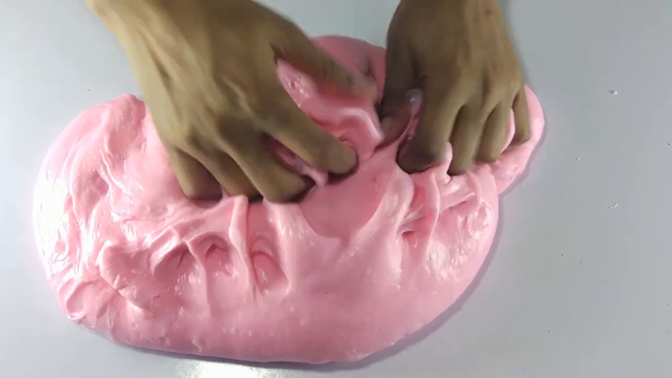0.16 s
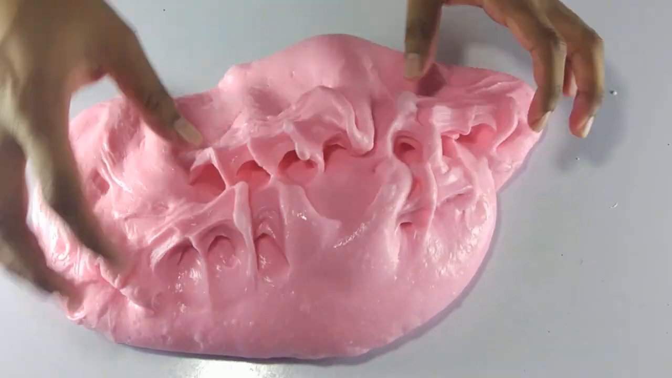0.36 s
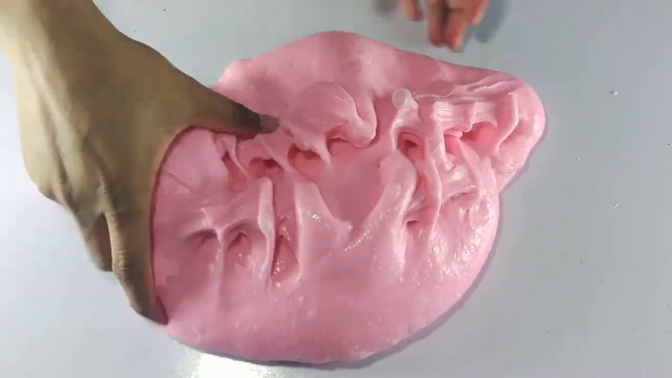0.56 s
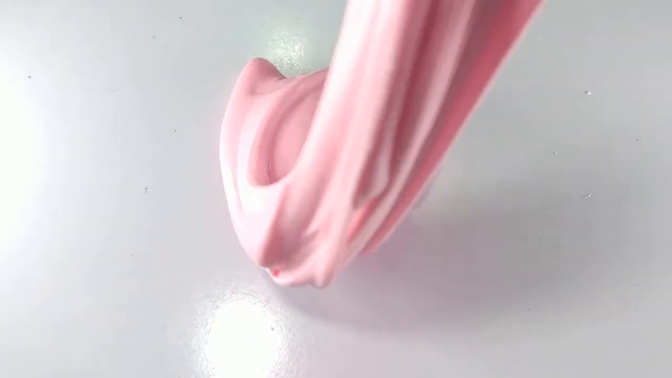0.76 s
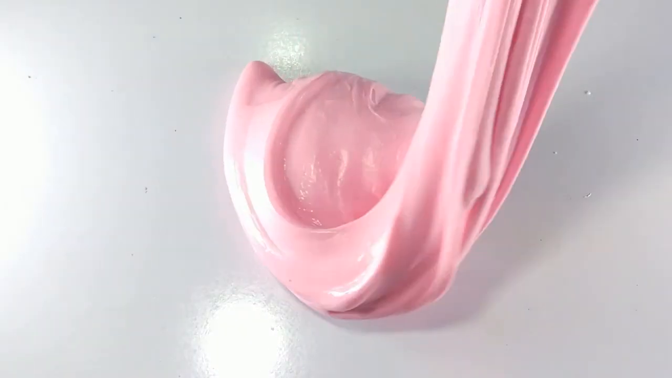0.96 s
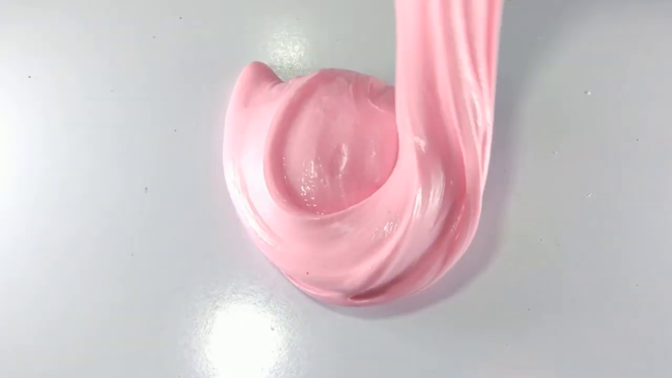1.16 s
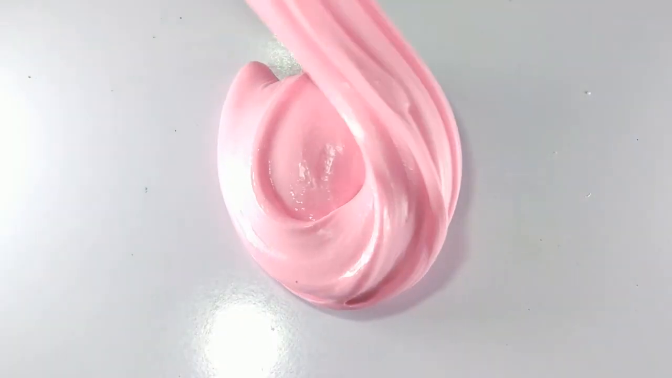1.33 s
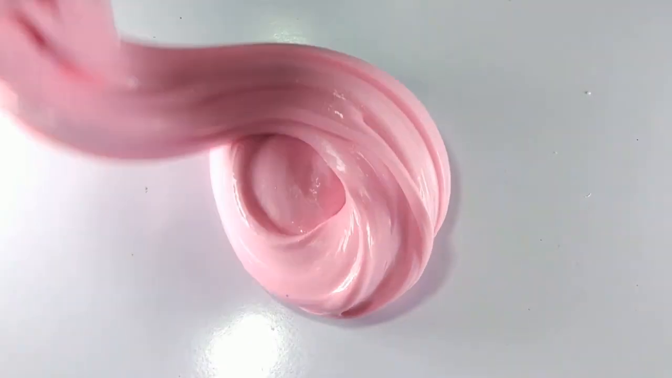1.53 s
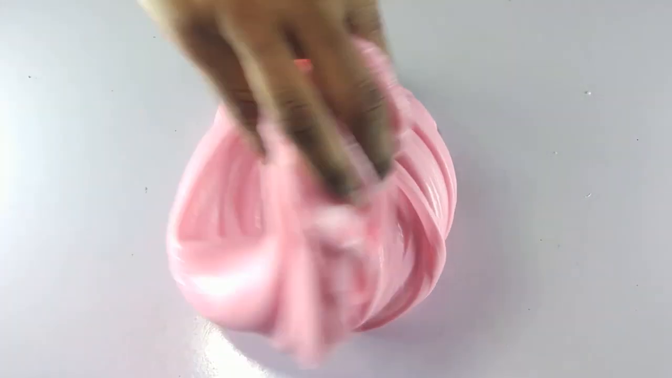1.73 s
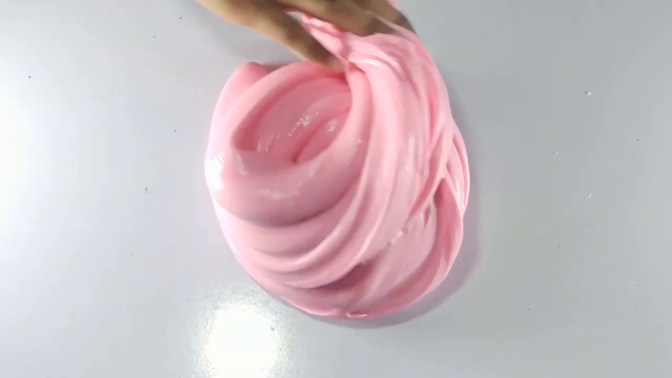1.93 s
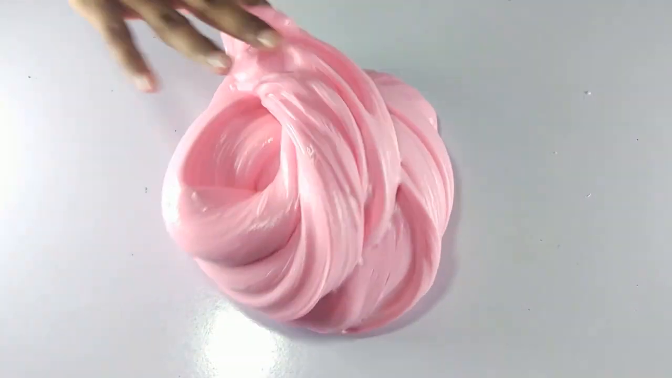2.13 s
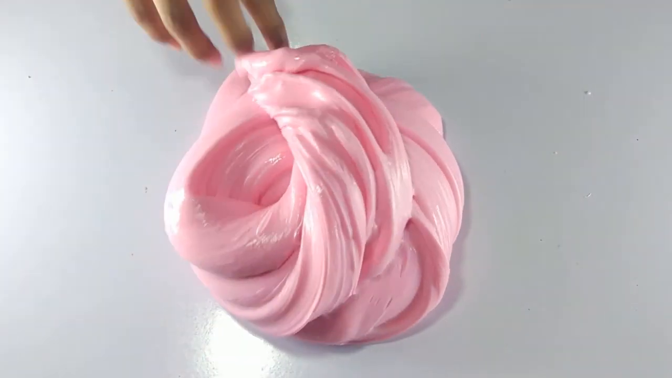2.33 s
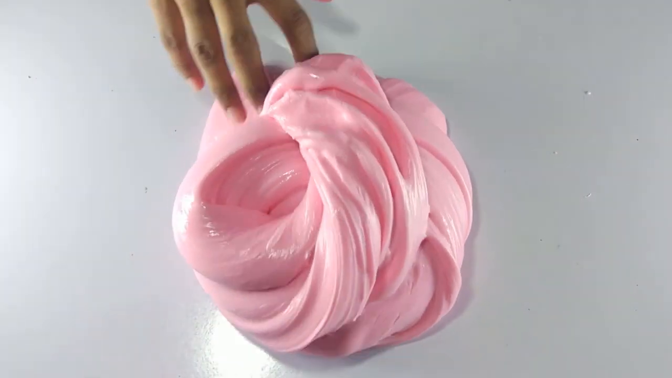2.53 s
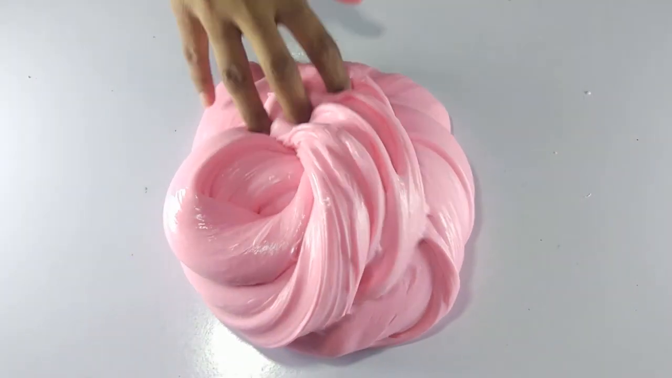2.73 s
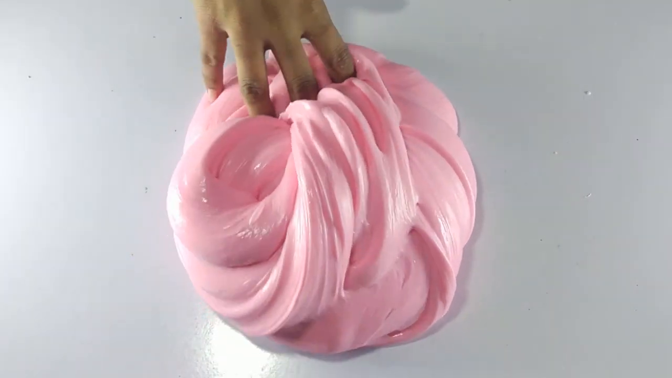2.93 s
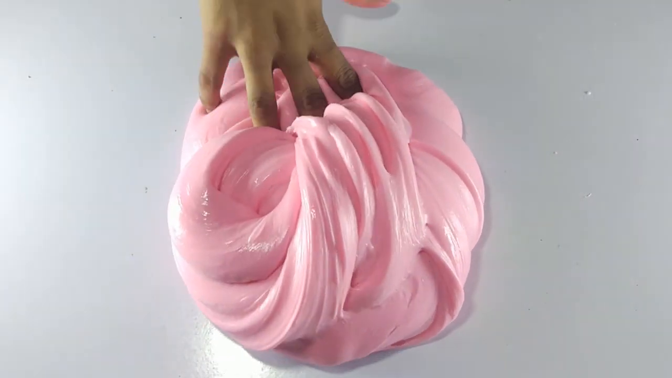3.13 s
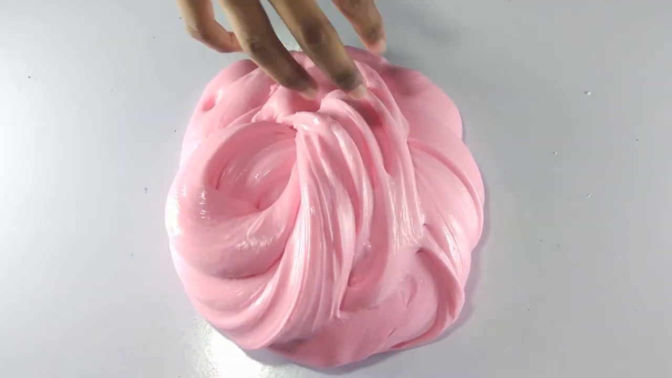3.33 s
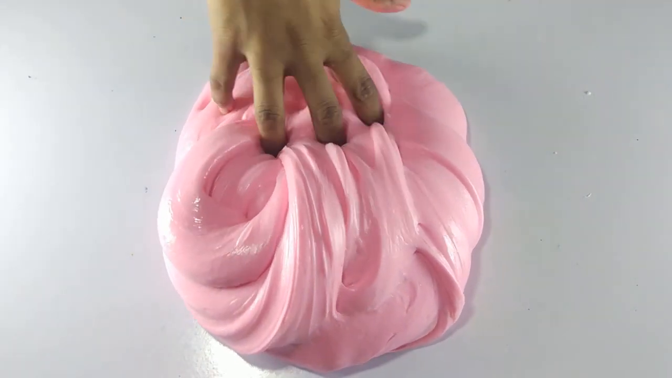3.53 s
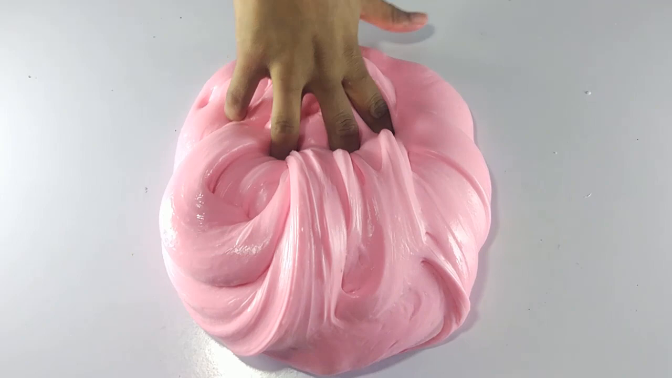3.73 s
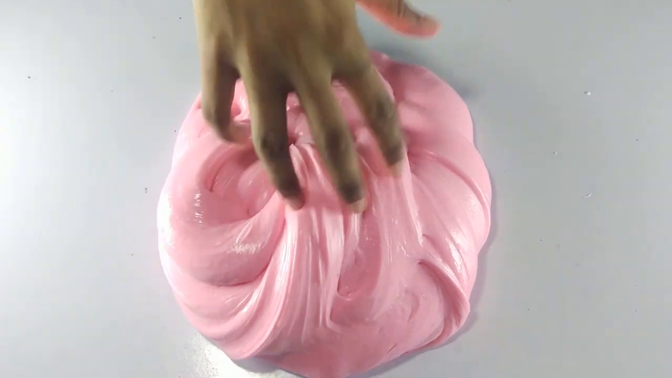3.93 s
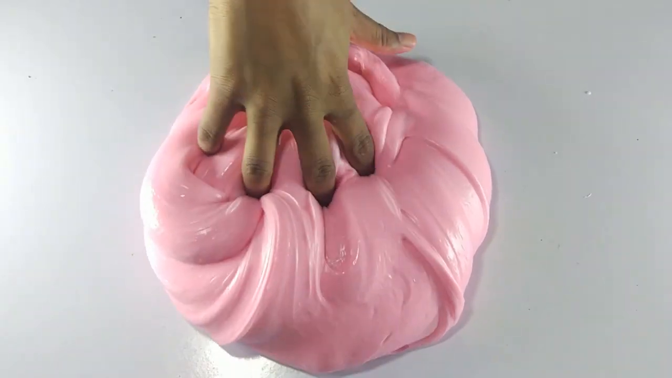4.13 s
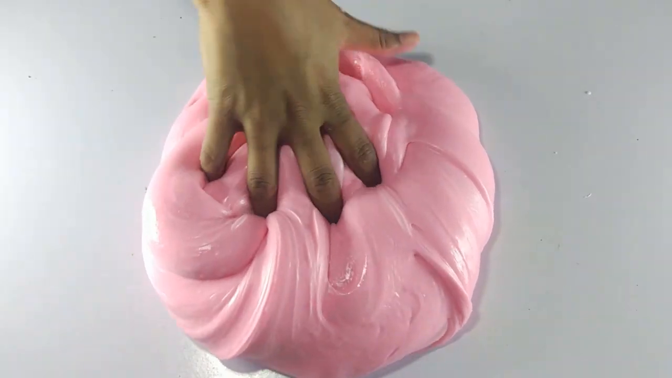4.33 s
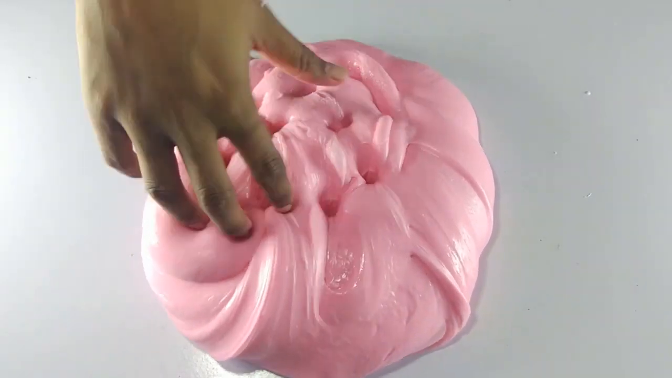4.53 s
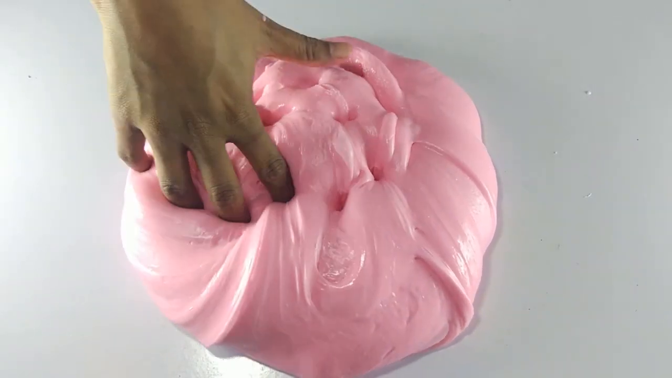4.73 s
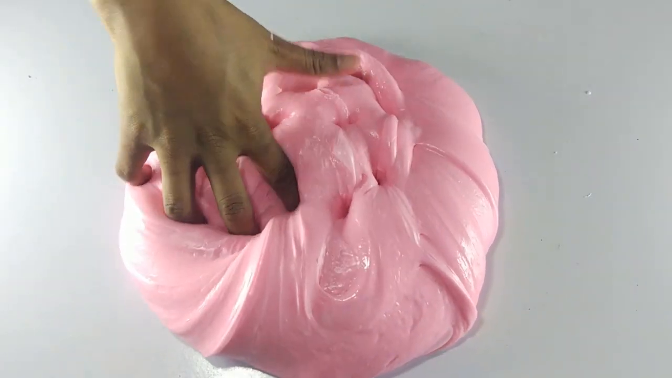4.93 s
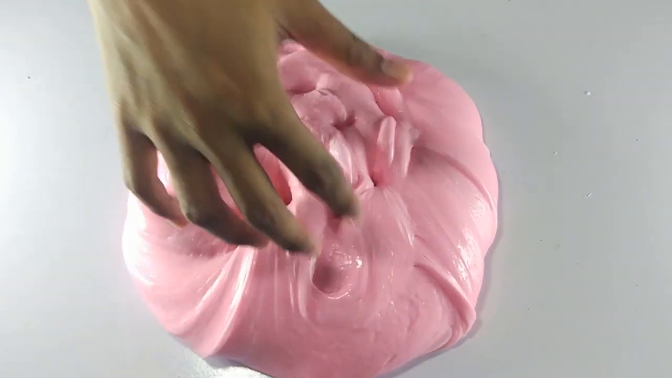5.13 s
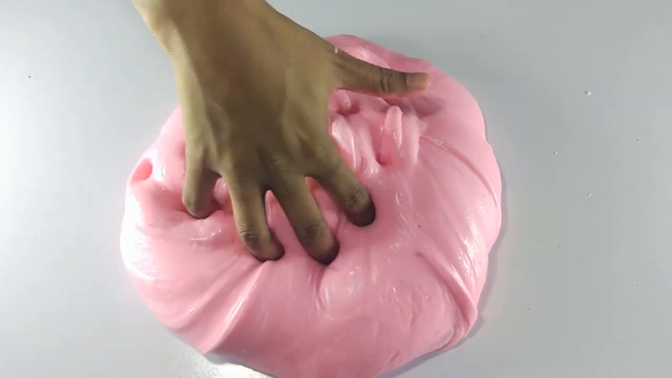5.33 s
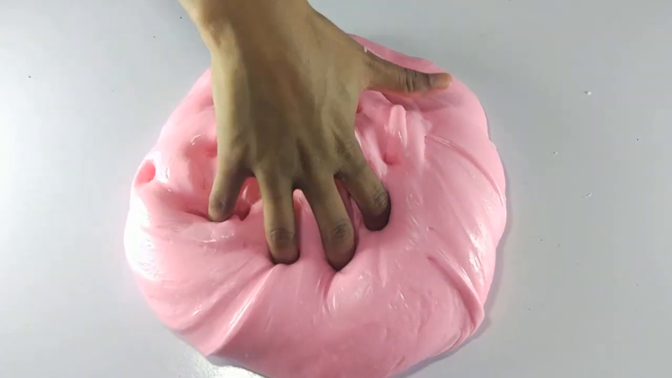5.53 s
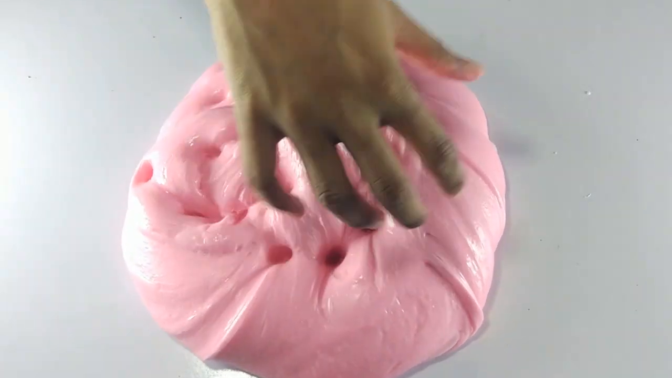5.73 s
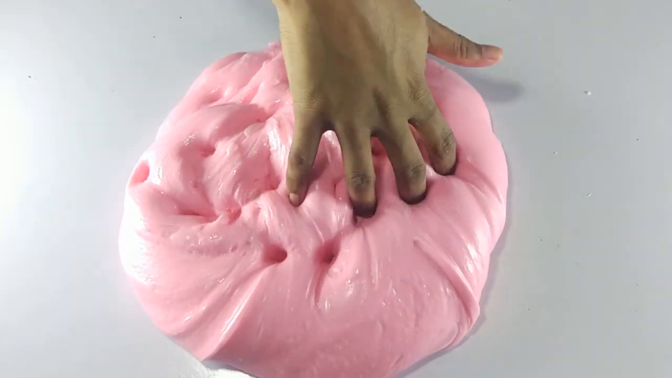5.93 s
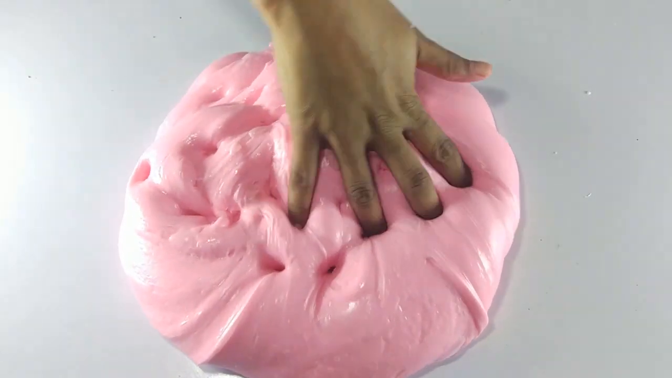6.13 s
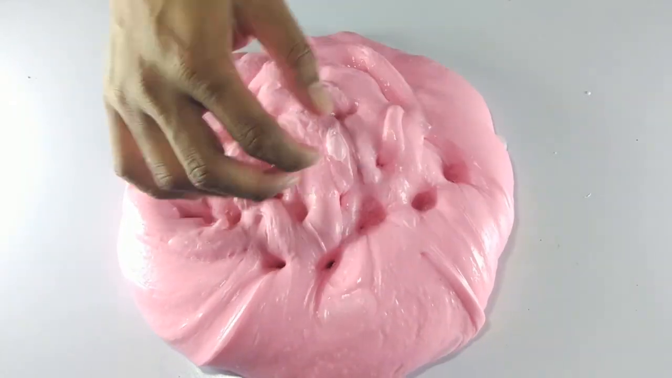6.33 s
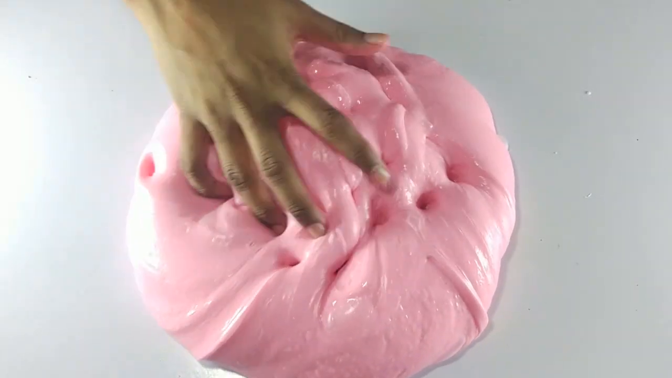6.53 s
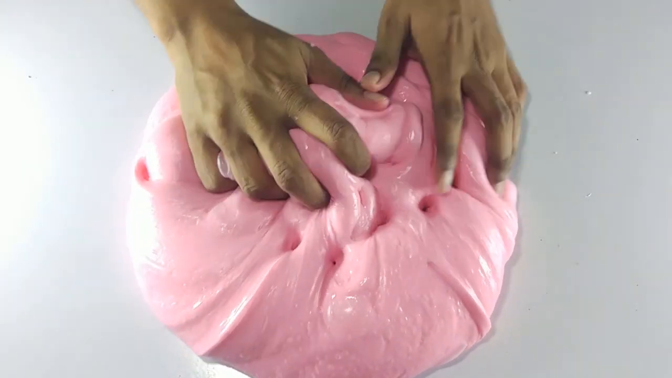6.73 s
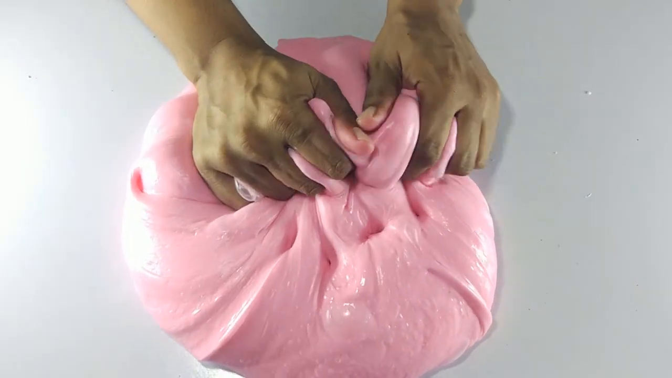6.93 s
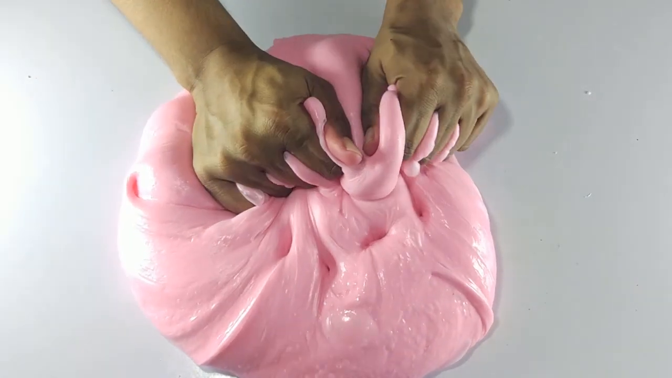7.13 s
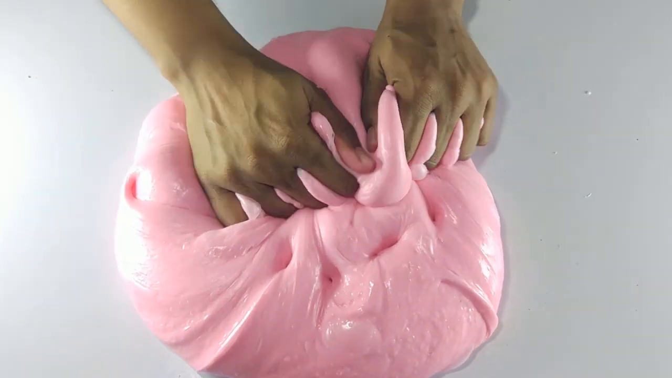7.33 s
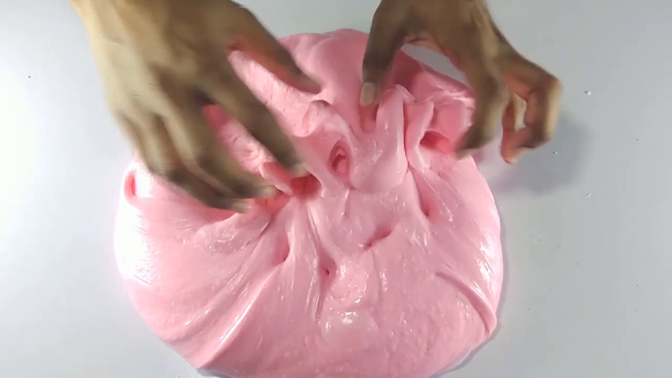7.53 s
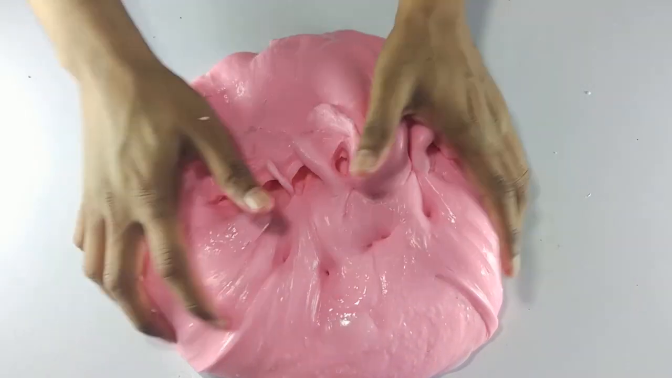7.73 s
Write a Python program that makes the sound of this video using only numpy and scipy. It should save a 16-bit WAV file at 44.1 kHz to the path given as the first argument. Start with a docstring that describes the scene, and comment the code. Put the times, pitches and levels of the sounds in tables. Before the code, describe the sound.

Hands work soft, sticky slime on a table, very close to the microphone. It opens with a sharp pop and a fizzing, wet squeeze, dotted with clicks, that cuts off at 0.7 seconds. A quiet stretch follows, with only faint peeling and tiny ticks as the slime is pulled and folded, and one sharp click at 2.7 seconds. Fingers then poke in at about 3.3, 3.9, 4.4, 5.0, 5.7 and 6.3 seconds, each time setting off a tight cluster of loud, bright pops with a short fizz and soft squelch. From 6.8 to 7.2 seconds a firm squeeze brings dense crackling, brief low gurgles of air and the loudest pop, near 7 seconds. Softer squelching and clicks continue from 7.4 seconds to the end, just before 8. The pops ring briefly in a small bare room, over faint steady hiss and low hum.

```python
"""Short wet pops and a sticky fizz: hands knead and poke foamy slime on a table in a small bare room.
Air pockets burst, bounce off the table and ring the room; skin peels off the fingers in tiny bursts.
Air squeaks out of small holes and gurgles through hollows. A faint hum and hiss lie underneath.
A two-port microphone sits just above the hands."""
import sys
import numpy as np
from scipy import signal
from scipy.fft import rfft, irfft
from scipy.io import wavfile
from scipy.ndimage import uniform_filter1d

SR = 44100
rng = np.random.default_rng(int(sys.argv[2]) if len(sys.argv) > 2 else 0)


def store_pcm(level_fs):
    """Save levels as 16-bit WAV."""
    pcm = np.round(np.clip(level_fs, -1, 1) * 32767).astype(np.int16)
    wavfile.write(sys.argv[1], SR, np.atleast_2d(pcm).T)


N = 347508

# Bursting pockets. Each row: time in seconds, level in dB, pitch in Hz, wet crack in dB, squelch in dB,
# left minus right in dB, room share in dB (low facing the microphone, high where a hand shades it).
POCKETS = [(0.012, -4.5, 7440, -9.5, -50, -3, -7), (0.094, -30, 10800, -5, -15, -14, 5),
           (0.138, -16, 4520, -7.5, -34, 1, 1.5), (0.1489, -25.5, 4250, -21, -23, -10, 13),
           (0.1682, -15, 6800, -1, -19.5, -6, 0.5), (0.2372, -29, 970, 6, -35, 5, 1),
           (0.247, -21.5, 1150, 13, -44, 6, 6), (0.2514, -21, 4500, -5, -33, 0, -10),
           (0.2951, -11, 6600, -7.5, -48, 11, 2), (0.2975, -23, 1780, -17, -45, -6, -5.5),
           (0.5743, -33, 12000, -25, -40, 3, 0), (0.5806, -22, 10000, -30, -34, -12, 5),
           (0.6143, -18, 9900, -2.5, -51, -10, 0), (0.632, -24.5, 3730, 4, -37, 7, -6),
           (0.6793, -33.5, 1550, -3, -23, -6, -5), (0.6985, -48, 2600, 2, -40, 6, -3),
           (0.7457, -56, 9900, -23, -40, 0, 0), (1.4697, -43, 9400, -13, -52, -16, 14),
           (1.7927, -39, 6200, -11, -27, 11, 8), (1.806, -49, 2500, -6, -20, 4, 2),
           (1.845, -46, 4200, -13, -30, 2, 2), (1.9073, -49.5, 2800, -10, -30, 0, -3),
           (2.0393, -46, 4200, -2, -30, -2, -4), (2.157, -35, 11200, -20, -40, 6, 3),
           (2.162, -48, 3130, -3, -30, 2, 5), (2.2156, -52, 3500, -12, -30, 2, 6),
           (2.234, -38, 12200, -19, -26, 10, -17), (2.7242, -34.5, 3300, -2, -41, 4, -4),
           (2.7376, -7.5, 11800, -26.5, -64, 5.5, -2.5), (3.231, -32, 10800, -17, -33, -10, 5),
           (3.2377, -22.5, 4930, -12, -24, 0, 10.5), (3.244, -21, 13000, -25, -25, -2, 13),
           (3.274, -2, 9200, -12, -23, 4.5, -2), (3.2769, -10, 4540, -14, -11.5, -3.5, 0.5),
           (3.4399, -30, 10900, -11, -28, -9, 4), (3.525, -32.5, 5450, -17, -35, 5.5, -2.5),
           (3.5887, -37.5, 9450, -25, -40, 12, 4), (3.727, -27, 4540, -17, -34, 3, 2.5),
           (3.854, -1, 6200, -13.5, -30.5, 6, 7.5), (3.8553, 2, 5510, -28, -56, -5, -4.5),
           (3.8781, -2.5, 9180, -10.5, -29, -2, -4.5), (3.8911, -10, 6400, -3, -11.5, -1.5, -8),
           (4.032, -18, 10500, -17.5, -58, 2, 2.5), (4.1067, -26, 8860, -22, -48, -2.5, -0.5),
           (4.202, -43.5, 8760, -7, -6.5, 0, 6), (4.4047, -20, 10260, -41, -30, -6, 9),
           (4.4203, -8.5, 6950, -35, -55, -12, 9), (4.4264, 0, 6100, -7, -25.5, 6, -3),
           (4.437, -4, 7240, -17, -17.5, -5, 4.5), (4.4393, -8.5, 6500, -16, -23, 11, -3),
           (4.6336, -32.5, 1990, 22, -18.5, -1, -2), (4.799, -37.5, 12500, -21.5, -29, 7.5, -0.5),
           (5.0215, -29, 14000, -12, -22, 6, -5), (5.0272, 2, 6770, -8, -32.5, 1.5, 3.5),
           (5.0389, -8, 6600, -4, -10, -2, 5.5), (5.045, -1.5, 4680, -41, -47, 1, 5),
           (5.0478, -2.5, 7690, -26, -45, -24, 6.5), (5.2528, -47, 2380, -8, -30, 6, 8),
           (5.286, -38, 9900, -19.5, -30, 1, 8), (5.332, -34, 8060, -27, -15.5, 5, 2),
           (5.454, -38, 9700, -10.5, -18.5, 5, 2), (5.5513, -45, 10140, -15.5, -23, 7, 0.5),
           (5.64, -37, 9600, -1, -25, -7, 9), (5.643, -28, 13600, -32.5, -30, -8, 2),
           (5.6651, -10.5, 8840, -2.5, -28, -11, 6), (5.6673, 2, 8000, -37, -47, -2, 0),
           (5.6773, -12, 8330, 0.5, -32, 13, 6), (5.6874, 1.5, 7700, -39, -30, -8, -1.5),
           (5.864, -48, 10950, -17, -32, 9, 3), (5.902, -43, 2830, -0.5, -17, 12.5, -7),
           (6.163, -44, 9200, -6.5, -9.5, -2, 14), (6.2212, -22, 1520, -18, -11.5, 2, 6),
           (6.2232, -32, 1590, -3, -31, 0, -10), (6.2427, -4, 8260, -21.5, -26.5, -3, -1),
           (6.257, -1, 7400, -29, -52, 4, -4.5), (6.2581, 2.5, 7600, -21.5, -45, -3, 1),
           (6.2614, -3.5, 3260, -13, -27.5, 0, -2), (6.266, -3.5, 5400, -16, -50, 7, 0.5),
           (6.2816, -7.5, 8430, 1.5, -13.5, 2, -2.5), (6.4584, -39, 9450, -12.5, -39.5, -5, -9),
           (6.5577, -38, 10650, -13.5, -30, -6, 13.5), (6.5657, -38, 9400, -24, -35, 0, -2),
           (6.5767, -30, 9930, -46, -42, -0.5, 5.5), (6.626, -34.5, 10500, -11.5, -30, -5, 13),
           (6.6279, -30, 4440, 4.5, -26, -2, 2.5), (6.645, -33, 9800, -26, -20, 4, 7),
           (6.6478, -29, 12300, -23, -27, -2, 5), (6.6634, -39, 5500, -13, -30, -3, 14),
           (6.705, -37, 11200, -5, -17, 2, 14), (6.727, -12, 11000, -41, -44, -2, 0),
           (6.749, -30.5, 2200, 15, -29, 4, -10), (6.7754, -20.5, 8570, -38, -40, 11.5, 10.5),
           (6.7792, -14, 1600, 1, -31, 7, 2), (6.7831, -23.5, 2400, 17, -31, -6, 5),
           (6.824, -15.5, 1150, -1, -4.5, 3, 3), (6.8706, -23, 4450, -16, 2, -1, 2),
           (6.883, -23.5, 1160, -10, 3.5, -7, 3), (6.8968, -17.5, 2040, -5, -20, 4, 8.5),
           (6.9024, -3, 1570, 0, -16.5, -1, -20), (6.9028, -9, 9200, -32, -40, 9, -4),
           (6.9583, 10.5, 10200, -6.5, -48, -2.5, -2), (6.9615, 2, 10800, -7.5, -16, -1, -5),
           (6.965, 1, 11000, -17, -36, -2, 5), (6.995, -7.5, 7700, -11, -47, -6, 7.5),
           (7.0825, -4.5, 7900, -15.5, -45, -3, -3), (7.12, -22.5, 11400, -14, -43, 4, 13),
           (7.178, -24, 9200, -18, -38, 13, 0), (7.191, -27, 7800, -11, -41, 16, 5),
           (7.2017, -35, 8900, -6, -37, 7, -5), (7.2414, -32.5, 13100, -7.5, -44, -1, 11.5),
           (7.2609, -33.5, 1470, -27, -34, 2, 2), (7.3225, -40, 12200, -19, -29, 0, 14.5),
           (7.3811, -28, 10300, -27, -18, -9, 9), (7.3958, -20, 4430, 0, -14.5, -4, 9),
           (7.429, -31.5, 1890, -6, -30, 0, -10), (7.522, -23.5, 2320, -6, -26, 2, -2),
           (7.722, -24, 4060, 0.5, -12.5, -4.5, 7.5), (7.7255, -23, 10500, -17.5, -31, -5, 7),
           (7.7776, -27.5, 13100, -5, -24, 6, 15.5), (7.8419, -19.5, 2060, -21, -32, 1, -6),
           (7.8477, -10.5, 10200, -43, -28.5, -3, 3.5), (7.8504, -20, 11600, -6, -31, 10, -11)]
# Resonances of the peeling fizz. Each row: centre in Hz, width in Hz, gain in dB.
FIZZ_MODES = [(6400, 1500, 8.5), (10500, 10900, 15), (14000, 3100, -6)]
# Resonances of the wet smack. Each row: centre in Hz, width in Hz, gain in dB.
SMACK_MODES = [(1576, 2940, 22.5), (2650, 990, 11.5), (3500, 640, 14.5), (4500, 1900, 0.5)]
# Hollows in the lump, lowest first. Each row: centre in Hz, width in Hz, gain in dB.
SQUELCH_MODES = [(234, 91, 15.5), (469, 340, 11.5), (662, 1000, 8.5)]
# Lowest hollow, fading as the lump is pressed flat. Each row: time in seconds, gain in dB.
DEEP_HOLLOW = [(0, 2.5), (.6, -3.5), (3.3, 2.5), (4.45, 3.5), (5.1, 4), (5.7, 3.5), (6.3, -11.5),
               (7.0, -5.5), (7.45, 0), (7.88, 5)]
# Reflections off table and walls. Each row: delay in seconds, gain in dB.
REFLECTIONS = [(.0015, -13), (.0034, -19), (.0114, -17), (.0154, -17)]
# Finger position. Each row: time in seconds, lag of the left port in samples.
HAND_LAG = [(0, 2.5), (2.74, 3), (3.24, 2.6), (3.28, 3.6), (3.85, 1.4), (3.88, 3.8), (4.03, .4),
            (4.42, 1.6), (4.44, 2.6), (5.03, 4.2), (5.05, 5.6), (5.665, 1.8), (5.69, 4.8), (6.24, -.6),
            (6.27, 1), (6.29, .2), (6.73, 2.4), (6.9, 3.6), (7.08, 3.2), (7.85, 5.2)]
# Squeezes, lifts and stretches. Each row: time of full strength, hold, rise and fall in seconds,
# then fizz, smack and squelch in dB.
KNEAD_STROKES = [(.008, 0.0029, 0.015, 0.027, -18, -34.5, -64),
                 (0.164, 0.091, 0.27, 0.045, -34.5, -46.5, -49.5), (0.464, .04, 0.085, 0.17, -75, -98, -63),
                 (0.584, 0.098, 0.1, 0.0098, -39, -48.5, -62), (0.855, 0.061, 0.031, 0.46, -63.5, -99, -75),
                 (1.155, 0.1, 0.11, 0.3, -80, -95, -76.5), (1.41, 0.046, 0.24, 0.096, -55.5, -75, -98),
                 (1.76, 0.054, 0.088, 0.22, -69, -96, -81), (1.796, 0.29, 0.39, 0.15, -61, -75.5, -72),
                 (2.132, 0.044, 0.054, 0.097, -55.5, -67, -88), (2.722, .01, 0.45, 0.22, -60, -69, -88),
                 (6.697, 0.011, 0.47, 0.46, -52, -66, -101),
                 (6.824, 0.075, 0.11, 0.18, -36.5, -52.5, -34.5),
                 (6.958, 0.0074, 0.021, 0.08, -30, -45.5, -26.5),
                 (7.032, 0.076, 0.14, 0.083, -34.5, -43, -63), (7.412, 0.1, .1, 0.023, -36.5, -42, -45),
                 (7.716, 0.19, 0.11, 0.11, -45, -53, -56)]
# Fingers stabbing in. Each row: deepest push in seconds, entry fizz in dB, its rise in seconds,
# squelch in dB, pull-out fizz in dB.
FINGER_POKES = [(3.282, -43, 0.041, -39, -61.5), (3.879, -44.5, 0.06, -33, -66.5),
                (4.451, -41, 0.095, -31, -84), (5.039, -46, 0.054, -31, -61),
                (5.679, -41.5, 0.061, -32.5, -68.5), (6.266, -44.5, 0.14, -28.5, -87)]
# Air through a hollow. Each row: time of full strength, hold, rise and fall in seconds, level in dB,
# pitch in Hz, share of pitch lost per second.
AIR_GURGLES = [(6.823, 0.024, 0.033, 0.035, -23.5, 557, 4.5), (6.876, 0.01, 0.023, 0.035, -29, 613, 0.7),
               (6.965, 0.015, 0.011, .05, -33.5, 340, 0.42), (7.433, 0.016, .03, 0.045, -44.5, 488, 1.4),
               (7.513, .02, .02, .03, -49.5, 730, 0.58)]
# Air leaving a small hole. Each row: start in seconds, level in dB, pitch in Hz.
AIR_SQUEAKS = [(1.4072, -54, 1860), (6.2, -34, 1894)]
# Room ring. Each row: centre in Hz, T60 in seconds, relative level in dB, build-up in seconds.
ROOM_BANDS = [(277, 0.2, 13, 0.013), (475, 0.23, 3, 0.0049), (950, 0.18, 5, 0.011), (1457, 0.14, 8, 0.0044),
              (2260, 0.24, 3, 0.0027), (3300, .26, 4, 0.0005), (5400, 0.27, -4.5, 0.002),
              (7700, 0.27, -2.5, 0.0012), (10500, 0.17, 4.5, 0.0014), (14000, 0.13, -14.5, .001)]
# Room tone spectrum. Each row: frequency in Hz, relative level in dB.
TONE_SPECTRUM = [(24, -72), (40, -27.5), (148, -16.5), (205, 2), (357, -11.5), (508, -5), (799, -21.5),
                 (2080, -20), (4000, -24.5), (6780, -24), (12400, -16), (15200, -61.5), (16400, -48)]
# Slow drift of room tone and hum. Each row: time in seconds, bass level change in dB.
TONE_DRIFT = [(0, -3.5), (.47, 1.5), (0.688, 2), (.72, -10), (.83, -5.5), (.9, 0.5), (1.2, -1.6), (1.6, -2),
              (1.8, 1.5), (1.97, -9.5), (2.2, 3.5), (2.65, -1), (3.099, 3), (4.2, 1.7), (4.8, 2),
              (5.5, 5.5), (6.0, 2), (7.88, 3.5)]
# Hum swells. Each row: time of full strength, hold, rise and fall in seconds, added hum in relative dB.
HUM_RISES = [(0.427, 0.036, 0.072, .06, 8), (1.77, 0.037, 0.17, .06, 12), (2.173, 0.035, 0.054, .2, 3),
             (5.494, 0.03, 0.11, 0.09, 10), (7.5, 0.083, 0.12, .2, 4)]

POP_SAMPLES, LEAD_SAMPLES = 2048, 64  # whole pop; part ahead of the burst
BREAK_S = 0.691  # the sound breaks off abruptly here, room ring and all


def pops():
    """Bursting pockets ring over a snap, a wet crack and a squelch. Returns stereo sound and room feed."""
    rip_gain, rip_rise_s, rip_decay_s = 0.18, 0.00027, 0.00056
    near, room_feed = np.zeros((2, N + POP_SAMPLES)), np.zeros(N + POP_SAMPLES)
    t = (np.arange(POP_SAMPLES) - LEAD_SAMPLES) / SR
    draws = rng.standard_normal((len(POCKETS), 1 + POP_SAMPLES))
    lump_lags_s = rng.uniform(0.00013, 0.000607, len(POCKETS))  # bounce off the lump itself
    refill = np.maximum(t, 0) * np.exp(-t / 0.0001)  # the hole left behind refills softly
    refill_peak = np.max(np.abs(body(refill, SQUELCH_MODES)))
    for pocket, draw, lump_lag_s in zip(POCKETS, draws, lump_lags_s):
        at_s, db, hz, crack_db, squelch_db, pan_db, room_db = pocket
        # pressure impulse amid briefly ripping skin
        tear = (t == 0) + rip_gain * draw[1:] * np.exp(np.minimum(-t / rip_decay_s, t / rip_rise_s))
        tone = unit_peak(body(tear, [(hz, 0.74 * hz, 0)]))
        snap_gain = undb(-6) * min(hz / 1300, 1) ** 2  # larger, lower pockets snap duller
        snap = snap_gain * unit_peak(body(tear, FIZZ_MODES))
        crack = undb(crack_db) * unit_peak(body(tear, SMACK_MODES))
        squelch = undb(squelch_db) * hollows(refill, at_s) / refill_peak
        pop = undb(db) * (unit_peak(tone + snap + crack) + squelch)
        bounces = REFLECTIONS + [(lump_lag_s, -8.5)]
        heard = pop + sum(undb(gain_db) * delay(pop, lag_s * SR) for lag_s, gain_db in bounces)
        left_lag_samples = curve(HAND_LAG, at_s) + 0.4 * draw[0]
        start = int(at_s * SR) - LEAD_SAMPLES
        span = slice(start, start + POP_SAMPLES)
        near[0, span] += undb(pan_db / 2) * delay(heard, left_lag_samples)
        near[1, span] += undb(-pan_db / 2) * heard
        room_feed[span] += undb(room_db) * pop
    return near[:, :N], room_feed[:N]


def hollows(x, at_s):
    """The lump's hollows resonate; the lowest changes level over time."""
    return undb(curve(DEEP_HOLLOW, at_s)) * body(x, SQUELCH_MODES[:1]) + body(x, SQUELCH_MODES[1:])


def peel():
    """Skin peels off the fingers: patchy, uneven bursts in three pocket sizes, plus lone sticky ticks."""
    ticks_per_s, tick_db = 210, -11
    out, t, gains = 0, np.arange(N) / SR, hand_effort()
    layers = [(FIZZ_MODES, 0.2), (SMACK_MODES, 0.1), (SQUELCH_MODES, 0.04)]
    for gain, (modes, bursts_per_sample) in zip(gains, layers):
        bursts = (rng.random(N) < bursts_per_sample) * rng.standard_normal(N)
        bursts *= undb(np.minimum(1.9 * rng.exponential(size=N), 7))
        sound = body(bursts, modes)
        rms = np.std(sound)
        if modes is SQUELCH_MODES:
            sound = hollows(bursts, t)
        out += sound / rms * gain * undb(2.54 * wander(rate_hz=40))
    ticks = (rng.random(N) < ticks_per_s / SR) * undb(np.minimum(3.5 * rng.exponential(size=N), 14))
    out += undb(tick_db) * gains[0] * unit_rms(ring(ticks, hz=4200, width_hz=4500))
    return out * ((t < BREAK_S) | (t > BREAK_S + 0.03))


def hand_effort():
    """Gains of fizz, smack and squelch: each knead and poke adds a swell to the resting lump."""
    rest_db, poke_smack_db = (-86.5, -89, -73), -12.5
    gains = undb(rest_db)[:, None] + sum(undb(row[4:])[:, None] * swell(*row[:4]) for row in KNEAD_STROKES)
    for at_s, entry_db, rise_s, squelch_db, pull_db in FINGER_POKES:
        entry = undb(entry_db) * swell(at_s - 0.044, hold_s=0.076, rise_s=rise_s, fall_s=0.14)
        pull = undb(pull_db) * swell(at_s + 0.16, hold_s=0.094, rise_s=0.084, fall_s=0.084)
        squelch = undb(squelch_db) * swell(at_s, hold_s=0, rise_s=0.048, fall_s=0.071)
        fizz = entry + pull
        gains += [fizz, undb(poke_smack_db) * fizz, squelch]
    return gains


def gurgles():
    """Uneven bubbles ring a hollow whose pitch sinks as it widens."""
    out, n = np.zeros(N), np.arange(SR // 3)
    for at_s, hold_s, rise_s, fall_s, db, hz, sag_per_s in AIR_GURGLES:
        bubbles = (rng.random(len(n)) < 0.03) * rng.standard_normal(len(n))
        hollow = unit_rms(body(bubbles, [(hz, 0.25 * hz, 0)]))
        glide_s = np.clip(n / SR - 0.1, -0.1, 0.1)
        sinking = np.interp(n - sag_per_s * SR * glide_s ** 2 / 2, n, hollow)
        span = int(at_s * SR) - SR // 10 + n
        out[span] += undb(db) * swell(at_s, hold_s, rise_s, fall_s)[span] * sinking
    return out


def squeaks():
    """Air whistles briefly out of a small hole, with a second partial."""
    half_length_s, octave_db = 0.0032, -7.5
    out, t = 0, np.arange(N) / SR
    for start_s, db, hz in AIR_SQUEAKS:
        envelope = np.exp(-((t - start_s - half_length_s) / half_length_s) ** 2)
        phase = 2 * np.pi * hz * t
        out += undb(db) * envelope * (np.sin(phase) + undb(octave_db) * np.sin(2 * phase))
    return out


def room_ring(x):
    """Wall echoes as bands of decaying noise, unrelated at the two ports in the treble."""
    first_wall_s, early_gain = 0.011, 0.98  # nearer things answer before the first wall
    t, response = np.arange(SR // 2) / SR, 0
    for hz, t60_s, db, build_s in ROOM_BANDS:
        mid, side = ring(rng.standard_normal((2, len(t))), hz, min(0.37 * hz, 4000))
        build_up = early_gain + 1 - np.exp(-np.maximum(t - first_wall_s, 0) / build_s)
        stereo = mid + min(hz / 1500, 1) * np.array([side, -side])
        response += undb(db - 60 * t / t60_s) * build_up * stereo
    response /= np.sqrt(np.sum(response ** 2) / 2)
    parts = np.split(x, [int(BREAK_S * SR)])
    return np.hstack([signal.fftconvolve(part[None], response, axes=1)[:, :len(part)] for part in parts])


def room_tone():
    """Hiss in half-octave bands that flicker separately; the bass drifts most."""
    out, (knots_hz, knots_db) = 0, np.transpose(TONE_SPECTRUM)
    drift_db = curve(TONE_DRIFT, np.arange(N) / SR)
    for hz in 50 * 2 ** np.arange(0, 8.5, 0.5):
        db = np.interp(np.log(hz), np.log(knots_hz), knots_db) + wander(rate_hz=5.7)
        db += min(600 / hz, 1) ** 0.5 * drift_db
        noise = rng.standard_normal((2, N)) + 0.5 * rng.standard_normal(N)
        out += undb(db) * body(noise, [(hz, hz / 2, 0)])
    return undb(-63) * unit_rms(out)


def hum(hz=205.4):
    """A low tone plus narrow noise; it wavers and now and then swells."""
    t = np.arange(N) / SR
    tone = unit_rms(ring(rng.standard_normal(N), hz, width_hz=15)) + 1.52 * np.sin(2 * np.pi * hz * t)
    lift = 1 + sum(undb(db) * swell(*timing_s) for *timing_s, db in HUM_RISES)
    return tone * lift * undb(-73.5 + 0.36 * curve(TONE_DRIFT, t) + 0.94 * wander(rate_hz=8.5))


def undb(db):
    return 10 ** (np.asarray(db) / 20)


def unit_rms(x):
    return x / np.sqrt(np.mean(x ** 2))


def unit_peak(x):
    return x / np.max(np.abs(x))


def curve(table, at_s):
    return np.interp(at_s, *np.transpose(table))


def ring(x, hz, width_hz):
    """Two-pole resonance, gain 1 at the centre."""
    return signal.lfilter(*signal.iirpeak(min(hz, 0.45 * SR), hz / width_hz, SR), x)


def body(x, modes):
    """Sum of resonances, each applied twice for steep skirts."""
    return sum(undb(db) * ring(ring(x, hz, width_hz), hz, width_hz) for hz, width_hz, db in modes)


def wander(rate_hz):
    """Slewed random levels, spread near 1."""
    step = int(SR / rate_hz)
    return 1.5 * uniform_filter1d(np.repeat(rng.standard_normal(N // step + 1), step), step)[:N]


def swell(at_s, hold_s, rise_s, fall_s):
    """Gain that holds at 1, with ramps of 30 dB per rise or fall time."""
    t = np.arange(N) / SR
    ramp = np.maximum((at_s - t) / rise_s, (t - at_s - hold_s) / fall_s)
    return undb(-30 * np.maximum(ramp, 0))


def delay(x, samples):
    """Fractional circular delay."""
    n = x.shape[-1]
    return irfft(rfft(x) * np.exp(-2j * np.pi * np.arange(n // 2 + 1) * samples / n), n)


def scene():
    """Pops, peeling, gurgles and squeaks, near and through the room, over hiss and hum."""
    near_pops, pop_feed = pops()
    slime, whistles = peel() + gurgles(), squeaks()
    direct = np.array([delay(slime + whistles, samples=2.29), slime + whistles])
    room_feed = undb(-4.5) * pop_feed + undb(-6.5) * slime + undb(-10) * whistles
    return near_pops + 0.5 * direct + room_ring(room_feed) + room_tone() + hum()


def record(dry):
    """Each port cuts bass and treble, the left one resonates; the amplifier squashes the loudest pops."""
    low_cuts_hz, high_cuts_hz = (254.3, 82.7), (17700, 10500)  # left, right
    ceiling, asymmetry, amp_low_hz, top_hz = 1.05, 0.054, 123, 15900
    left = dry[0] + 0.8 * ring(dry[0], hz=12850, width_hz=5540)
    ports = []
    for port, low_hz, high_hz in zip((left, dry[1]), low_cuts_hz, high_cuts_hz):
        port = signal.lfilter(*signal.butter(2, low_hz, "high", fs=SR), port)
        ports.append(signal.lfilter(*signal.butter(1, high_hz, fs=SR), port))
    squashed = ceiling * np.tanh(np.array(ports) / ceiling)
    out = signal.lfilter(*signal.butter(1, amp_low_hz, "high", fs=SR), squashed)
    out += asymmetry * out ** 2
    return signal.sosfilt(signal.ellip(10, 0.2, 70, top_hz, fs=SR, output="sos"), out)


dry = scene()
out = record(dry)
store_pcm(out)
```